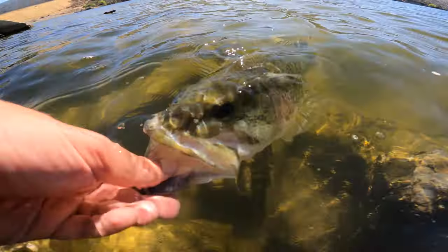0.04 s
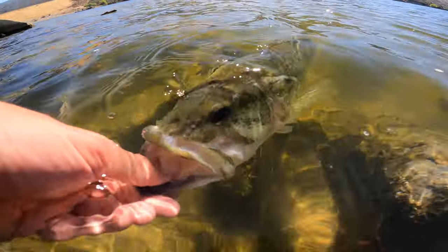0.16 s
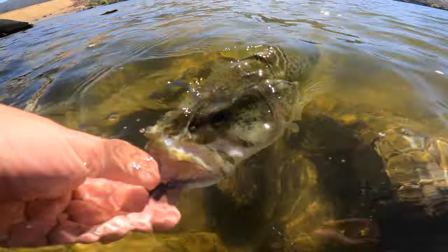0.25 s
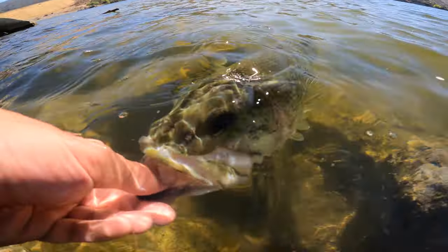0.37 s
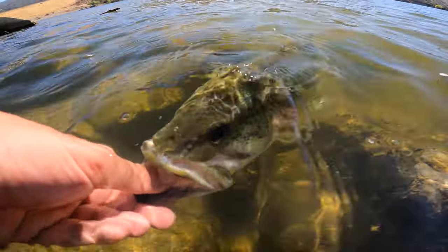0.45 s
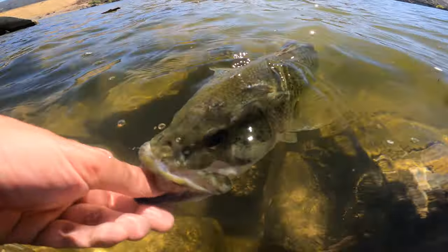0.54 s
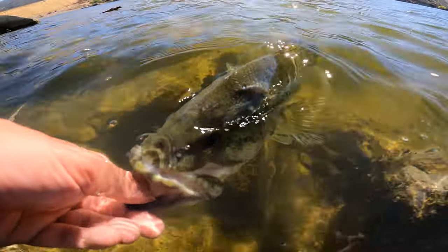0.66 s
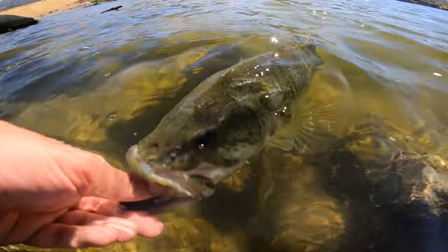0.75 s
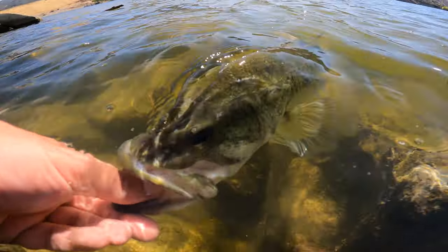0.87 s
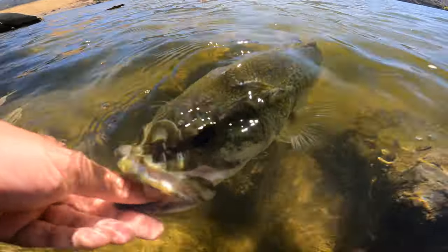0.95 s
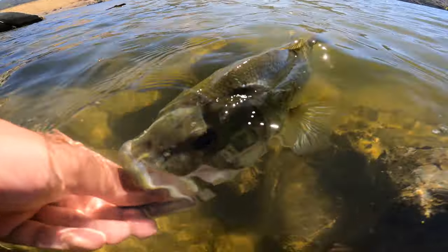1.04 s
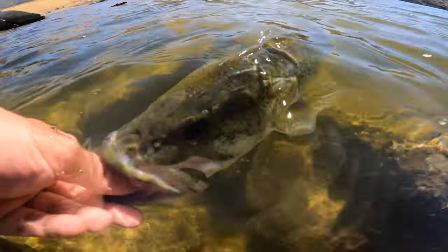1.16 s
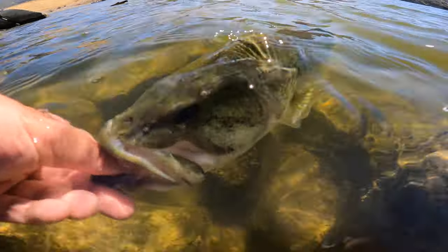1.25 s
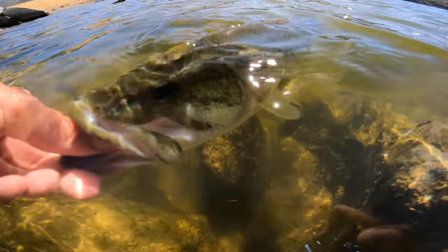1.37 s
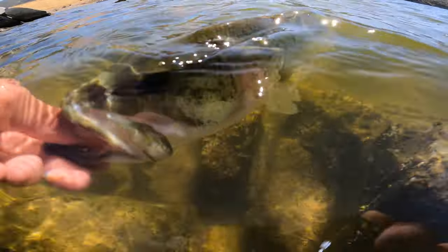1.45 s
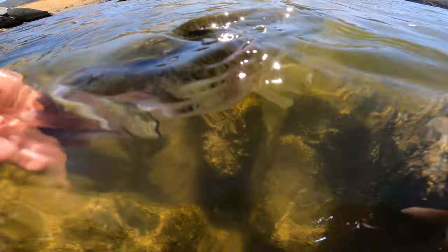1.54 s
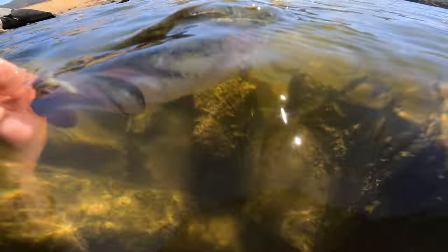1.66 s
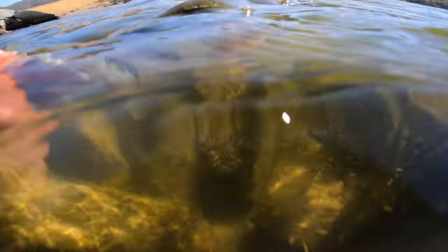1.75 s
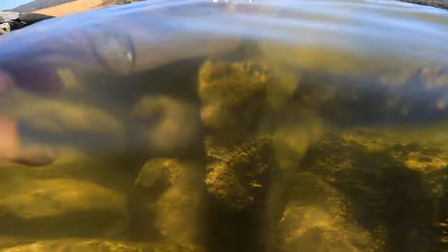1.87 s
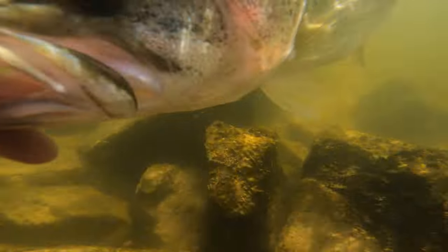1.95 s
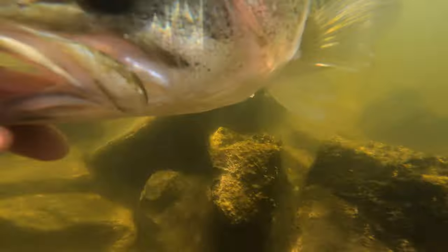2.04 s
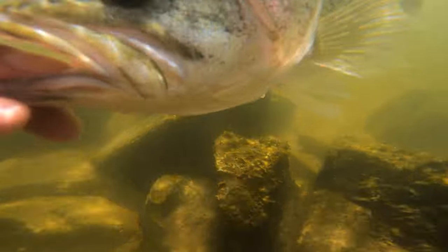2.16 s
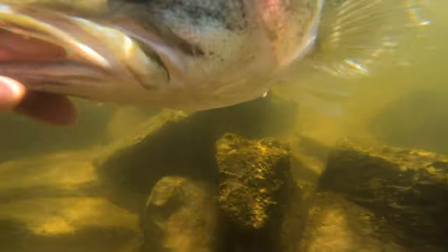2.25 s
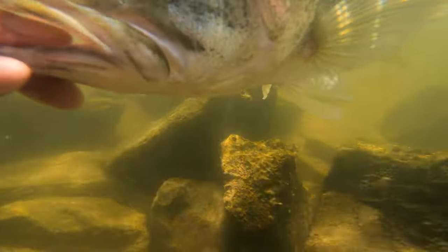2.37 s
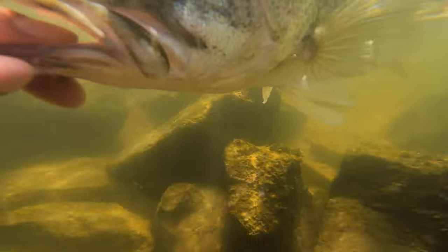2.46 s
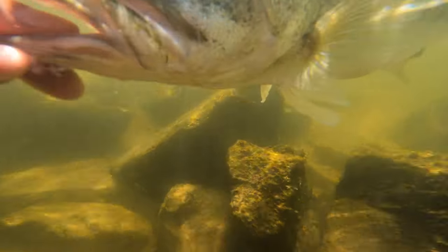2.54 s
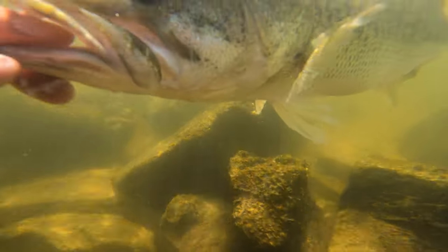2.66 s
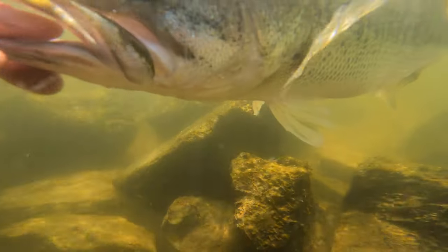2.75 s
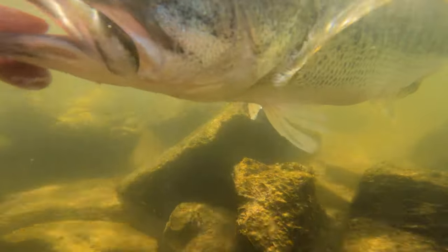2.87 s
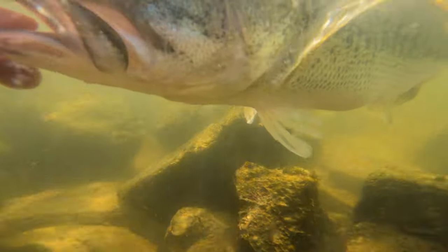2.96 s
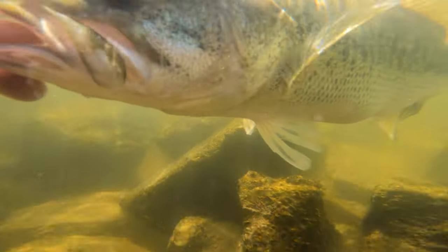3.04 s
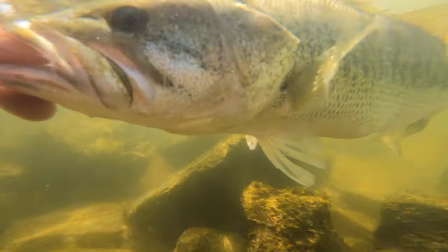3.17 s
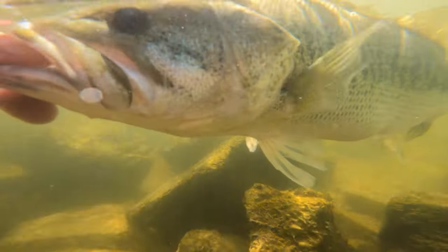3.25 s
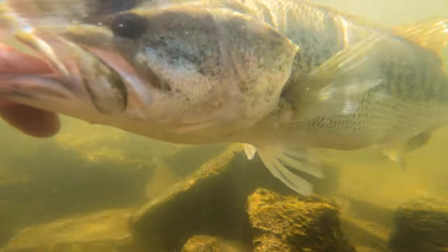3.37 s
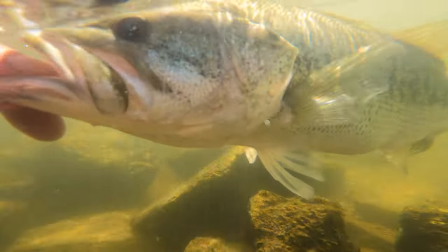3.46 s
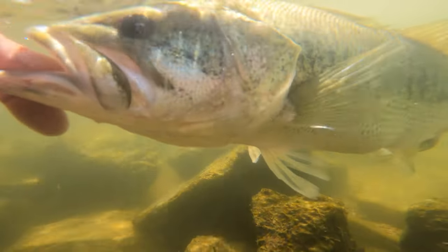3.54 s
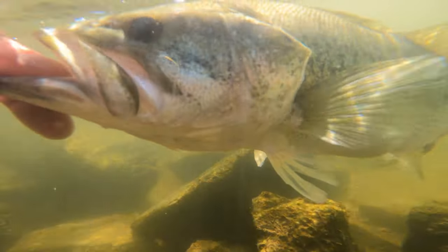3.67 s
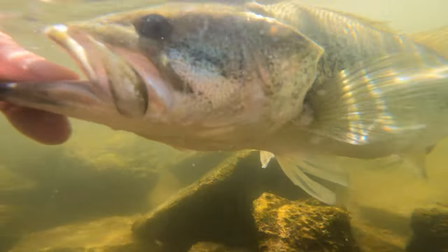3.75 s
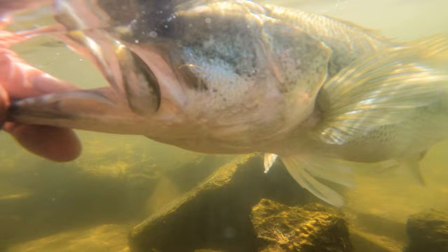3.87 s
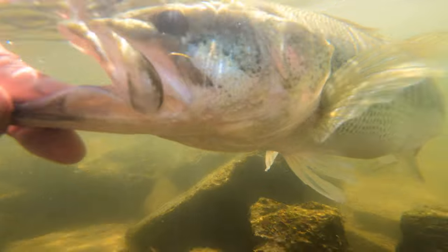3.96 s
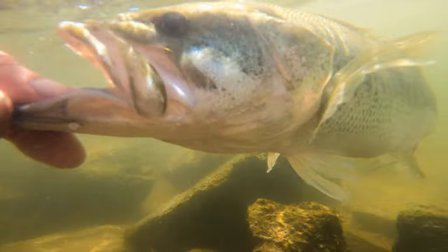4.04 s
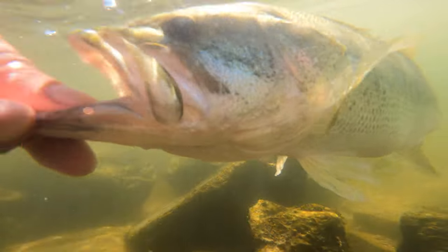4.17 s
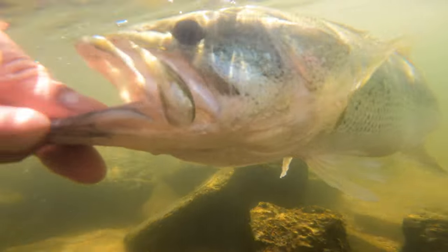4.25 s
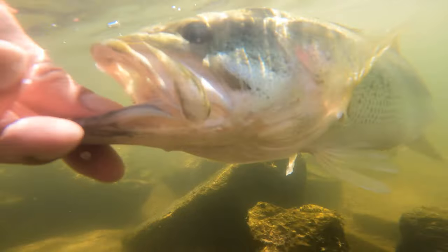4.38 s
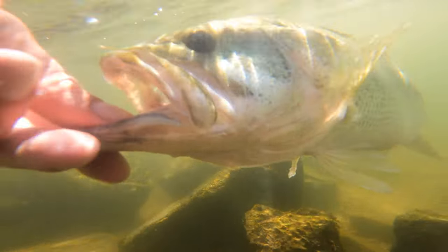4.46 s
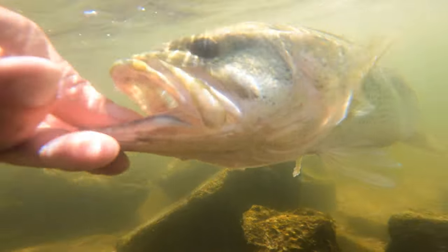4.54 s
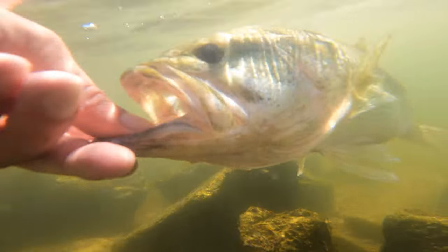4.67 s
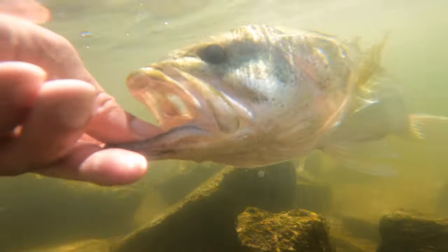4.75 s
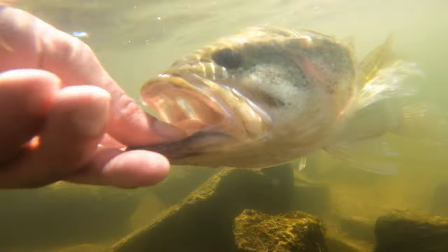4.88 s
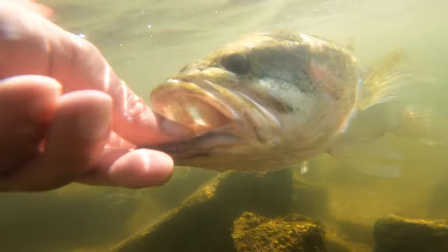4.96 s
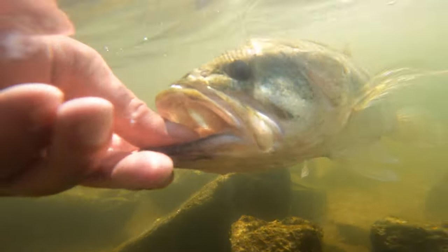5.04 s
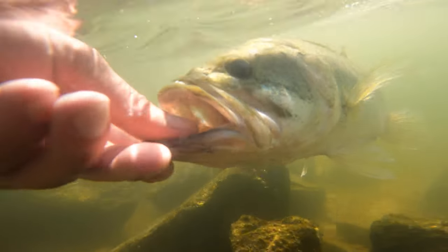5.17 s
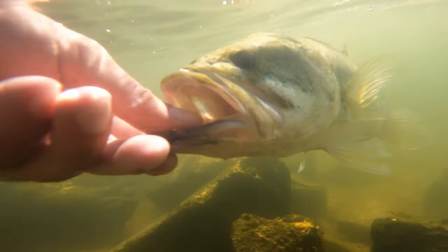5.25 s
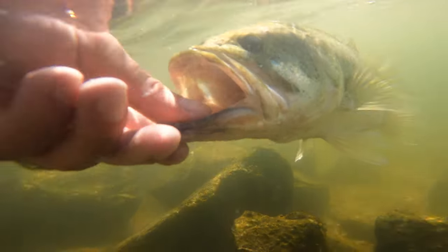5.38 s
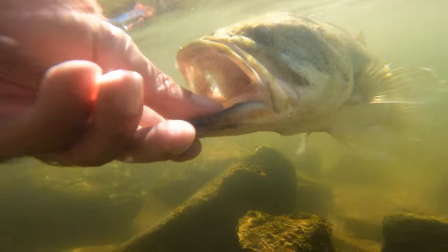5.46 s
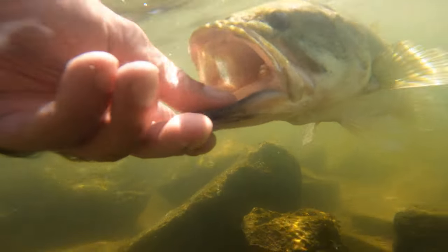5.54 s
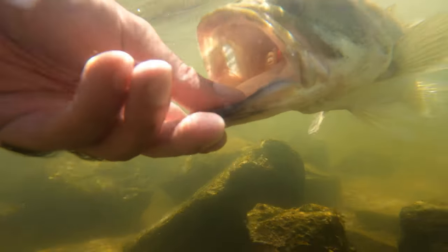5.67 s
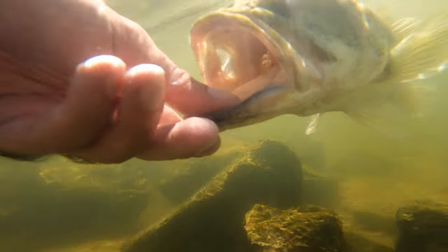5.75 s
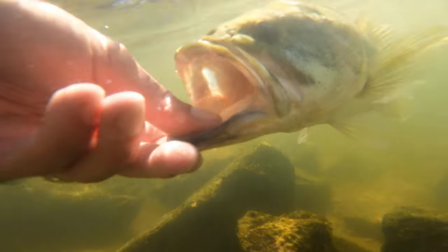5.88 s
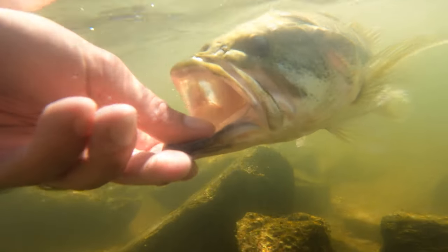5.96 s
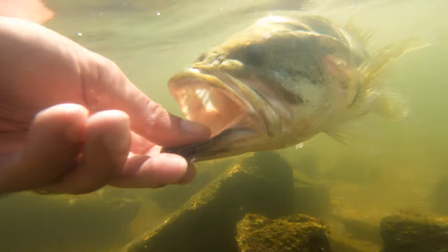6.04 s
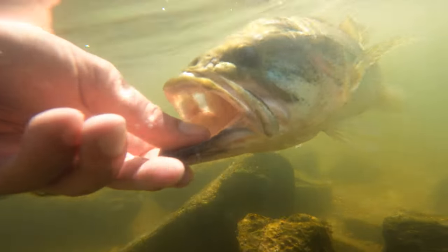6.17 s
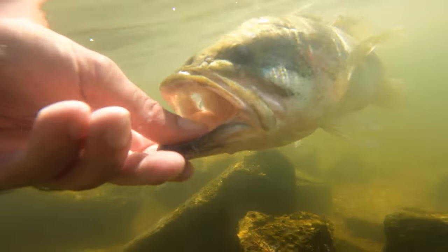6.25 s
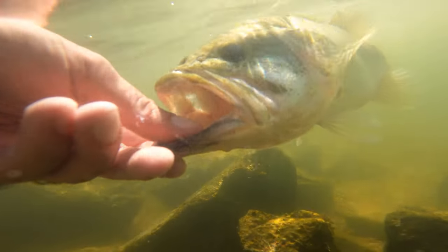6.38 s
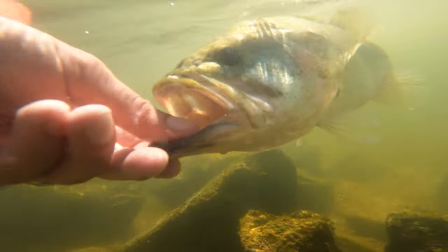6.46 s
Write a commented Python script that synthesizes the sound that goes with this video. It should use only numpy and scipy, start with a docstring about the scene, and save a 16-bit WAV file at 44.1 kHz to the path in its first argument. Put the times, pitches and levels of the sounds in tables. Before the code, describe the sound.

A camera held just over a lake beside a hand-held fish picks up a dull breeze, faint hum, soft lapping and tiny droplets. Just before two seconds it plunges under with a hard, loud pop and gurgle. Afterwards everything is close and muffled: low pressure rumble, grainy rushing water, bubbles ringing, chirping upward, and hollow pops with small bright snaps that become sparser toward the end.

```python
"""Water rushes round the housing of a submerged action camera, with heavy rumble and air that pops,
gurgles and chirps: coloured noise, struck resonances and ringing bubbles at two unequal wet ports.
Before the dip at about 1.75 s the camera is held over a lake beside a hand-held fish: a dull breeze,
a faint hum, lapping ripples and droplets, all heard in air. A limiter ducks the rush at every hard pop.
"""
import sys
import numpy as np
from scipy import signal
from scipy.fft import rfft, irfft
from scipy.io import wavfile
from scipy.ndimage import uniform_filter1d, minimum_filter1d

SR = 44100
rng = np.random.default_rng(int(sys.argv[2]) if len(sys.argv) > 2 else 0)


def master_out(mix):
    """Clip the mix to full scale and print it as 16-bit PCM to the path in sys.argv[1]."""
    frames = np.transpose(np.atleast_2d(mix))
    ceiling = np.clip(frames, -1, 1)
    pcm = np.round(ceiling * 32767).astype(np.int16)
    wavfile.write(sys.argv[1], SR, pcm)


N = 287091
TIME = np.arange(N) / SR
FREQS = np.maximum(np.arange(N // 2 + 1) * SR / N, 1)

# Colours of the noises in air, relative: pitch_hz, density_db (per Hz)
BREEZE_COLOUR = [(12, -16), (20, 2), (65, 4), (97, 0.5), (129, -4.5), (220, -4.5), (297, -9.5), (370, -14),
                 (500, -12), (620, -17), (800, -12), (870, -38), (1100, -23), (1430, -67)]
LAPPING_COLOUR = [(900, 22), (1100, 5), (1350, 8.5), (1800, 0.5), (2100, -8), (2500, -11.5), (3300, -18.5),
                  (5000, -30)]
WASH_COLOUR = [(900, 16), (1400, -0.5), (1950, -5), (3000, -10), (5000, -21)]
SPRAY_COLOUR = [(2500, -6.5), (4500, -3), (7500, -3), (10000, -12), (12500, -13), (15000, -3)]
# Left-right likeness in air and at the wet ports: pitch_hz, likeness (0 to 1)
AIR_ALIKE = [(100, 0.98), (420, 0.98), (790, 0.66), (1500, 0.78), (2900, 0.33), (5500, 0.45)]
WET_ALIKE = [(30, 0.96), (80, .8), (200, 0.47), (700, 0.49), (1400, 0.47), (3000, 0.61)]
# Faint steady hum, as of a far-off motor: pitch_hz, level_db (rms)
HUM_LINES = [(212, -52.5), (334, -50), (560, -53.5), (678, -52.5), (776, -55), (1346, -73.5)]
# Wavelets washing over the fish's back: centre_s, half_length_s (to 1/e), level_db, highest_hz
WAVELETS = [(0.87, 0.21, -54.5, 3170), (1.43, 0.38, -50, 2080), (0.2, 0.57, -66, 2800)]
# Ripples breaking round the fish into fine spray: peak_s, level_db
RIPPLE_BREAKS = [(0.01, -84), (0.85, -90), (1.09, -69.5), (1.44, -78), (1.74, -63.5)]
# Droplets falling back on the surface: start_s, level_db (halved in amplitude when mixed)
DROPLETS = [(0.413, -57), (0.7266, -45.5), (0.839, -67), (1.204, -52), (1.4615, -49), (1.5984, -56),
            (1.702, -42.5)]
# Colour of the pressure rumble, relative: pitch_hz, density_db (per Hz)
RUMBLE_COLOUR = [(14, -10), (25, 7), (32, -3), (42, 2), (55, -9.5), (80, -14), (105, -18.5), (140, -26.5),
                 (260, -38.5)]
# The heave dips just after the dive, then swells to full level: time_s, level_db
HEAVE_LEVEL = [(1.8, -2), (1.89, -6), (1.96, 0)]
# Extra level of the rumble above 60 Hz: time_s, level_db
UPPER_RUMBLE = [(1.8, 2), (2.1, 4), (2.3, 0.5), (3.0, 2), (3.7, 0.5), (4.5, 1.5), (6.4, -3.5)]
# Strength of the flow round the housing, before eddies: time_s, level_db
FLOW_STRENGTH = [(1.84, -28.5), (1.92, -32), (1.96, -29), (2.055, -39.5), (2.11, -29), (2.24, -45),
                 (2.3, -34), (2.4, -34), (2.52, -25), (2.73, -37.5), (2.84, -30), (2.92, -34), (3.07, -27),
                 (3.24, -33.5), (3.55, -26.5), (3.72, -28), (3.96, -31), (4.15, -34.5), (4.5, -33.5),
                 (4.88, -37.5), (5.25, -36), (5.42, -35), (5.68, -42), (5.98, -39), (6.5, -40.5)]
# Rush and fizz while air clings to the ports, and once flooded: pitch_hz, density_db (per Hz)
RUSH_CLINGING = [(100, -12), (170, -8), (310, -3.5), (430, -8.5), (560, -4.5), (740, 4.5), (1000, -3.5),
                 (1250, -11), (1600, -23.5), (2200, -35)]
RUSH_FLOODED = [(100, -1), (170, -1), (260, 0), (480, -2), (680, 1), (830, -6.5), (1000, 1.5), (1250, -10),
                (1550, -21), (2000, -34.5)]
FIZZ_CLINGING = [(1300, -7.5), (1800, -0.5), (2300, -3), (2800, 3.5), (3500, -5.5), (4000, -11.5),
                 (4900, -15), (5700, -25.5), (9000, -37), (14000, -40.5)]
FIZZ_FLOODED = [(1400, -27), (2100, -9.5), (2400, -4.5), (2700, 5.5), (3000, -6), (3450, -5.5), (4000, -18),
                (5000, -18.5), (7000, -27.5), (14000, -36.5)]
# Difference between the wet microphone ports: pitch_hz, left_minus_right_db, left_lead_rad
PORT_DIFFERENCE = [(30, -5, -0.28), (120, -4.5, -0.43), (342, -4.5, -1.14), (660, -10.5, -1.5),
                   (970, -2, -1.33), (1410, 0, -1.5), (1950, -1, -2.2), (2740, 3.5, -1.5), (3900, 6, -0.6),
                   (5500, 3.5, 0.13), (9000, 0.5, 0.14)]
# Swarms of bubbles: start_s, end_s, level_db (rms over the span), lowest_hz, highest_hz
SWARMS = [(1.75, 1.79, -50, 4400, 6800), (1.761, 1.773, -37, 1400, 4900), (1.743, 1.787, -17, 170, 730),
          (1.931, 2.13, -26.5, 68, 170), (1.93, 2.051, -45.5, 1270, 2400), (2.083, 2.111, -21, 588, 1500),
          (2.082, 2.114, -38, 1470, 4000), (2.082, 2.1, -61, 4800, 8800), (1.97, 2.04, -65, 4000, 8500),
          (2.27, 2.46, -67.5, 2900, 4900), (2.112, 2.11, -36.5, 700, 1900), (2.46, 2.552, -29.5, 530, 1250),
          (2.63, 2.63, -40.5, 700, 1700), (2.82, 2.84, -53.5, 2200, 3430), (3.03, 3.15, -22, 380, 1110),
          (3.452, 3.983, -58.5, 1700, 3400), (4.49, 4.75, -32, 142, 221), (5.299, 5.48, -36, 940, 1134)]
# Bubbles that rise in pitch as they break free: start_s, peak_db (before flutter), start_hz,
# length_s, rise_octaves
RISING_BUBBLES = [(1.703, -33.5, 4770, 0.0032, .2), (1.963, -28.5, 4640, 0.006, 0.25),
                  (2.318, -33, 1517, 0.0091, 0.24), (2.436, -40, 1384, 0.014, 0.72),
                  (3.027, -25, 1910, .014, 1.08), (3.112, -31.5, 1297, 0.033, 0.6),
                  (3.116, -55.5, 4740, .03, 0.05), (3.134, -41.5, 2110, 0.017, 0.82),
                  (3.204, -30.5, 2120, 0.016, 0.76), (3.312, -20, 1327, .028, 0.56),
                  (3.332, -30, 2160, .013, 0.71)]
# Bright snaps, many of them the sharp edge of a pop: start_s, peak_db (click), ring_hz,
# ring_db (re click), highest_hz
BRIGHT_SNAPS = [(1.7605, -23, 4800, -5.5, 6000), (1.7704, -12.5, 2650, -14.5, 4730),
                (1.7725, -33, 5200, -11.5, 13000), (1.967, -32.5, 1650, -3.5, 3460),
                (2.024, -28, 2235, -3, 2900), (2.0806, -24.5, 2374, -3.5, 4600),
                (2.11, -31, 2320, -9.5, 3700), (2.2219, -32.5, 2930, 1, 4060), (2.35, -29, 2820, -4, 5550),
                (2.4453, -34.5, 1760, -2.5, 3900), (2.488, -34.5, 2960, -12, 5470),
                (2.5776, -23.5, 3390, -1.5, 4320), (2.669, -35.5, 3500, -0.5, 3820),
                (2.841, -36.5, 2910, 1, 4380), (2.967, -41, 1860, -5.5, 4000),
                (3.1677, -33, 2320, -11.5, 5300), (3.503, -24.5, 2780, -3.5, 5170),
                (3.63, -38.5, 2710, -3, 3440), (3.656, -48.5, 3860, -3, 5500), (3.985, -33, 2200, -6, 2800),
                (4.004, -39, 1894, -2, 4400), (4.1225, -32.5, 2630, -2, 3200),
                (4.5547, -29.5, 2630, -4.5, 3150), (5.1383, -35, 2660, -2.5, 3000),
                (5.364, -39, 1790, 0, 2950), (5.4276, -33.5, 2635, 3, 3270), (5.553, -30, 2660, -5, 3760),
                (5.5948, -21.5, 2720, 3.5, 4170), (5.6021, -16.5, 2760, -12, 4450),
                (5.877, -44.5, 1800, -6.5, 4500), (6.1647, -29, 2650, -5.5, 3100)]
# Resonances that every pop shakes in the housing: pitch_hz, level_db, t60_s
HOUSING_MODES = [(172, -18, 0.033), (336, -7, 0.012), (638, -7.5, 0.013), (974, -5, 0.011),
                 (1160, -11, 0.0044), (2630, -37, 0.012)]
# Air pockets popping on the housing: start_s, force_db (before cushioning and filters), ring_hz,
# ring_db (re force), cycles_rung (count to -60 dB), knock_tilt_db (per octave)
AIR_POCKETS = [(1.755, -19, 925, -10, 28, -5.5), (1.761, -10, 908, 4.5, 57, 5),
               (1.7719, 17, 946, 7.5, 3.2, 1.5), (1.8192, -8, 1140, -2, 12, -5.5),
               (1.965, 0.5, 733, -15, 57, 6), (2.004, 4.5, 733, -8.5, 28, -5),
               (2.023, 7.5, 900, -7, 5.5, 0), (2.031, -14, 1116, 1.5, 23, -2.5),
               (2.067, -7, 737, -4.5, 30, 2.5), (2.0825, 0.5, 1160, -11.5, 35, -0.5),
               (2.091, -16.5, 1430, 8, 24, -7.5), (2.100, -7, 1160, -0.5, 36, 12),
               (2.110, 8.5, 540, -8, 6.2, -2.5), (2.171, -4.5, 653, -4, 12, -3),
               (2.222, -9.5, 1120, -1.5, 11.6, 10), (2.35, -16.5, 1420, -1.5, 7, 11),
               (2.408, -24, 1038, -5, 18.6, 1), (2.445, 3, 1530, -8, 13, 4),
               (2.558, -9.5, 780, 5, 28, -3.5), (2.566, -5, 1144, -2, 8.5, -8.5),
               (2.5781, -2.5, 678, -9.5, 5.5, -1), (2.669, 5, 668, -3.5, 25, 2.5),
               (2.766, -30, 405, 6.5, 8, 2.5), (2.841, -20.5, 982, -1.5, 5.9, 4),
               (2.872, 0, 759, 3, 4.3, 3), (2.877, 3.5, 365, -2, 6.1, -0.5),
               (2.965, -10.5, 785, 6.5, 13, -5.5), (3.024, -0.5, 667, -1.5, 14, -6.5),
               (3.066, -13, 927, 3, 16, 0), (3.094, -10.5, 592, 1, 12, -2),
               (3.119, -9.5, 690, 2.5, 12, -1.5), (3.168, 1, 609, 2.5, 16, -4),
               (3.319, -4, 1590, -7, 11, -1), (3.501, -11.5, 1360, -4.5, 8, 3),
               (3.842, -15, 190, -5, 2.2, -3), (3.882, -18.5, 907, 1, 36, 7), (3.92, -12, 937, -0.5, 29, 1),
               (3.972, -22, 888, 6, 13, 0), (3.985, 10, 1093, 3, 8.2, 6), (4.003, -2.5, 709, 0, 13, -3),
               (4.054, -23, 977, -8.5, 6.9, -5.5), (4.131, -15.5, 974, -1.5, 24, -0.5),
               (4.556, 7, 1515, -10, 26, 4), (4.591, -1, 992, -4.5, 9.8, -1.5),
               (5.025, -18.5, 960, -3.5, 35, 3), (5.139, 2.5, 1492, -8, 30, 1),
               (5.228, -11.5, 1034, -7, 17, 7), (5.363, -29, 1078, 21.5, 17, -1),
               (5.4901, 4, 973, -9, 14, -2), (5.554, 2.5, 1384, -10, 7.3, 2.5),
               (5.583, -18.5, 1016, 4.5, 24, 7), (5.595, 0, 1076, -4, 13, 2.5),
               (5.6019, -2.5, 1016, -7.5, 13, -1.5), (5.798, -29, 1100, 11.5, 13.5, -1.5),
               (5.878, -13.5, 181.5, -17.5, 4.8, 5.5), (6.074, -21, 612, -3, 9.7, -4.5),
               (6.166, 4.5, 1523, -9.5, 24.4, 2.5), (6.303, -14.5, 1013, -5, 29, 1.5),
               (6.319, -28.5, 1250, 12, 7, -7), (6.414, -24.5, 195, 3, 6.9, 7),
               (6.447, -18, 1416, 6, 3.3, -2.5)]

# In air: the lapping grows as the camera nears the water
DIVE_S, NEARING_FROM_S = 1.775, 1
BREEZE_DB, LAPPING_FAR_DB, LAPPING_NEAR_DB = -32.5, -54, -47
HUM_WAVER_HZ = 2.49
# time constants of the swell and fall of each ripple
RIPPLE_ATTACK_S, RIPPLE_RELEASE_S, SPRAY_FLOOR_DB = 0.024, 0.095, -80
# Under water: a coat of air muffles the ports just after the dive, then peels off
CLEARING_S, MUFFLE_HZ, MUFFLE_DB = (1.83, 1.956), 970, -26
FLOODED_S = (3.9, 4.8)   # start and end of the flooding of the ports
RUMBLE_DB = -20   # pressure swings on the housing, relative
EDDY_SWELL_DB, FIZZ_SWELL_DB = 3.11, 2.2
FIZZ_DB, TICK_DB, TICKS_PER_S = -29, -43, 24   # levels re the flow; ticks are pinhead bubbles bursting
CRACKLE_SPREAD_DB, STRAY_SPREAD_DB, SPRAY_SPREAD_DB, TICK_SPREAD_DB = 3.2, 3.6, 3.5, 4.4
CHIRP_FLUTTER_DB = 2
SNAP_LOW_HZ, SNAP_SPATTER_S, SNAP_RING_S = 1700, 0.0066, 0.021   # both times to -60 dB
POP_ATTACK_S = 0.001   # water cushions every collapse
BASS_DUCK = 0.06   # share of the limiter's dB that the deep bass takes
CUTOFF_HZ = 15200   # top of the output band


def from_db(db):
    """Decibels to gain."""
    return 10 ** (np.asarray(db) / 20)


def rms_one(x):
    """Scale to unit power."""
    return x / np.sqrt(np.mean(x ** 2) + 1e-20)


def in_time(rows):
    """Each column of a curve at every sample."""
    s, *columns = np.transpose(rows)
    return [np.interp(TIME, s, c) for c in columns]


def in_frequency(rows):
    """Each column of a spectrum at every frequency, read on a log scale of pitch."""
    hz, *columns = np.transpose(rows)
    return [np.interp(np.log(FREQS), np.log(hz), c) for c in columns]


def lowpass(x, hz, steepness):
    """Smooth low-pass with no delay."""
    return irfft(rfft(x) / (1 + (FREQS / hz) ** steepness), N)


def butter(x, hz, kind, order=2):
    """Causal Butterworth filter."""
    return signal.sosfilt(signal.butter(order, hz, kind, fs=SR, output="sos"), x + 1e-18)


def drift(rate_hz):
    """Random wander of spread 1, mostly slower than the given rate."""
    return rms_one(lowpass(rng.standard_normal(N), rate_hz, 2))


def grains(per_s, spread_db):
    """Random impulses of very unequal size; rms 1."""
    excess = np.minimum(rng.exponential(1, N), 4)
    sizes = from_db(spread_db * excess) * rng.choice([-1, 1], N)
    return rms_one(sizes * (rng.random(N) < per_s / SR))


def noise(spectrum, likeness, grain=0):
    """Stereo noise of a given colour, with grains mixed into its middle; mid rms 1."""
    mid, side = rng.standard_normal((2, N))
    alike = np.clip(in_frequency(likeness)[0], 0, .999)
    lowest_hz, highest_hz = spectrum[0][0], spectrum[-1][0]
    colour = from_db(in_frequency(spectrum)[0])
    colour = colour / (1 + (FREQS / highest_hz) ** 8) / (1 + (lowest_hz / FREQS) ** 4)
    mid = irfft(rfft(rms_one(mid + grain)) * colour, N)
    side = irfft(rfft(side) * colour * np.sqrt((1 - alike) / (1 + alike)), N)
    return np.array([mid + side, mid - side]) / np.std(mid)


def ring(hz, t60, rise=0):
    """A struck resonance; a bubble's pitch rises by the share `rise` as it dies."""
    t = np.arange(SR // 10) / SR
    age = t / max(t60, .001)
    phase = 2 * np.pi * hz * t * (1 + rise * np.minimum(age, 1) / 2)
    return np.sin(phase) * 1000. ** -age


def add(track, s, sound):
    """Mix a sound in at time s."""
    i = max(round(s * SR), 0)
    track[i:i + len(sound)] += sound[:N - i]


def breeze():
    """Dull moving air, a low noise whose level wanders a little."""
    return from_db(BREEZE_DB + 1.0 * drift(6.1)) * noise(BREEZE_COLOUR, AIR_ALIKE)


def hum():
    """Faint sine lines that waver a little in pitch."""
    out = np.zeros(N)
    for hz, db in HUM_LINES:
        pitch = hz + HUM_WAVER_HZ * drift(4.8)
        out += from_db(db) * np.sqrt(2) * np.sin(2 * np.pi * np.cumsum(pitch) / SR)
    return out


def lapping():
    """Small ripples lap as a steady noise that grows toward the dip."""
    level_db = np.interp(TIME, [NEARING_FROM_S, DIVE_S], [LAPPING_FAR_DB, LAPPING_NEAR_DB])
    return from_db(level_db) * noise(LAPPING_COLOUR, AIR_ALIKE)


def wash():
    """Wavelets wash over the fish as rounded swells of noise, each with its own treble limit."""
    water = noise(WASH_COLOUR, AIR_ALIKE)
    out = np.zeros((2, N))
    for s, half_s, db, top_hz in WAVELETS:
        swell = np.exp(-((TIME - s) / half_s) ** 2)
        out += from_db(db) * swell * butter(water, top_hz, "low", order=14)
    return out


def spray():
    """Breaking ripples and short droplets open the level of a grainy bright noise."""
    splash = np.full(N, from_db(SPRAY_FLOOR_DB))
    for s, db in RIPPLE_BREAKS:
        distance = np.maximum((s - TIME) / RIPPLE_ATTACK_S, (TIME - s) / RIPPLE_RELEASE_S)
        splash += from_db(db) * np.exp(-distance)
    for s, db in DROPLETS:
        add(splash, s, .5 * from_db(db - 60 * TIME[:SR // 20] / 0.013))
    return splash * noise(SPRAY_COLOUR, AIR_ALIKE, 0.69 * grains(290, SPRAY_SPREAD_DB))


def open_air():
    """All sound in air, shut off as the lake closes over the ports."""
    closing = np.clip((DIVE_S - TIME) / 0.016, 0, 1)
    return (breeze() + hum() + lapping() + wash() + spray()) * closing


def rumble():
    """Water pressure heaves on the ports, in swings of fairly even size."""
    heave = noise(RUMBLE_COLOUR, WET_ALIKE)
    power = uniform_filter1d(heave.mean(0) ** 2, SR // 16)
    heave = heave / (power + 0.013) ** 0.78   # evens out the swings
    deep = lowpass(heave, 60, 6)
    upper = (heave - deep) * from_db(in_time(UPPER_RUMBLE)[0])
    return from_db(RUMBLE_DB + in_time(HEAVE_LEVEL)[0]) * (deep + upper)


def snaps():
    """Bright snaps, many of them the sharp edge of a pop: click, brief spatter and ring."""
    out, age = np.zeros(N), TIME[:SR // 10]
    bursts = rng.standard_normal((len(BRIGHT_SNAPS), len(age)))
    for (s, db, hz, ring_db, top_hz), burst in zip(BRIGHT_SNAPS, bursts):
        click = (age == 0) + 0.26 * burst * from_db(-60 * age / SNAP_SPATTER_S)
        click = butter(butter(click, SNAP_LOW_HZ, "high"), top_hz, "low", order=16)
        tone = butter(ring(hz, SNAP_RING_S), top_hz * 1.3, "low", order=12)
        add(out, s, from_db(db) * (click / np.abs(click).max() + from_db(ring_db) * tone))
    return out


def chirps():
    """A wobbling bubble leaves the housing, swelling and sweeping upward."""
    out = np.zeros(N)
    for s, db, start_hz, length_s, octaves in RISING_BUBBLES:
        hz = start_hz * 2 ** np.linspace(0, octaves, round(length_s * SR))
        sweep = np.sin(2 * np.pi * np.cumsum(hz) / SR)
        add(out, s, from_db(db) * np.hanning(len(hz)) ** 2 * sweep)
    return out * from_db(CHIRP_FLUTTER_DB * drift(390))


def gurgles():
    """Air tears off in swarms of bubbles, each ringing a few cycles at a pitch set by its size."""
    out = np.zeros(N)
    for start, end, db, low_hz, high_hz in SWARMS:
        swarm, chance = np.zeros(SR), rng.random(size=(36, 3))
        for k, (delay, size, force) in enumerate(chance):
            hz = low_hz * (high_hz / low_hz) ** size
            bubble = (-1) ** k * from_db(-13 * force) * ring(hz, 12 / hz, rise=0.052)
            add(swarm, (k + delay) / len(chance) * (end - start), bubble)
        swarm = butter(swarm, [low_hz / 1.5, high_hz * 0.95], "band", order=3)
        span_rms = np.sqrt(np.sum(swarm ** 2) / (abs(end - start) * SR))   # a zero span gives silence
        add(out, start, from_db(db) * swarm / span_rms)
    return out


def pops():
    """Each collapse knocks the housing; its air pocket rings for some cycles; water muffles both."""
    out, age = np.zeros(N), TIME[:SR // 10]
    strengths = from_db(0.7 * rng.standard_normal((len(AIR_POCKETS), len(HOUSING_MODES))))
    for (s, force_db, hz, ring_db, cycles, tilt_db), row in zip(AIR_POCKETS, strengths):
        knock = np.zeros(len(age))
        for k, (strength, (mode_hz, db, t60)) in enumerate(zip(row, HOUSING_MODES)):
            mode_db = db + tilt_db * np.log2(mode_hz / 700)
            knock += (-1) ** k * strength * from_db(mode_db) * ring(mode_hz, t60)
        # the decay steepens as the pocket breaks up
        pocket = np.sin(2 * np.pi * hz * age) * from_db(-60 * (age * hz / cycles) ** 1.313)
        pocket = butter(pocket, 1500, "low", order=4)
        cushion = 1 - np.exp(-age / POP_ATTACK_S)
        add(out, s, from_db(force_db) * cushion * (knock + from_db(ring_db) * pocket))
    return butter(butter(out, 3400, "low", order=4), 71, "high")


def strays(low_hz, high_hz, per_s):
    """Single bubbles of many sizes, ringing at random; rms 1."""
    pitches = np.geomspace(low_hz, high_hz, 12)
    bubbles = np.zeros(N)
    for hz in pitches:
        strikes = grains(per_s / len(pitches), STRAY_SPREAD_DB)
        bubbles += signal.oaconvolve(strikes, ring(hz, 22 / hz, rise=0.05))[:N]
    return rms_one(butter(butter(bubbles, 550, "high"), 1150, "low", order=4))


def flow():
    """Grainy rush, stray bubbles, fizz and ticks narrow onto housing resonances as the ports flood."""
    flow_db, = in_time(FLOW_STRENGTH)
    flooded = np.interp(TIME, FLOODED_S, [0, 1])
    eddies, crackle = drift(13.0), grains(260, CRACKLE_SPREAD_DB)

    def blend(early, late):
        """Equal-power crossfade as the ports flood."""
        return np.sqrt(1 - flooded) * early + np.sqrt(flooded) * late

    water = blend(noise(RUSH_CLINGING, WET_ALIKE, 0.5 * crackle),
                  noise(RUSH_FLOODED, WET_ALIKE, 0.5 * crackle))
    bubbles = blend(strays(low_hz=603, high_hz=1250, per_s=78),
                    strays(low_hz=864, high_hz=1405, per_s=55))
    bubbles = bubbles * np.interp(TIME, CLEARING_S, [0, 1]) ** 3
    rush = from_db(flow_db + EDDY_SWELL_DB * eddies) * (0.83 * water + 0.51 * bubbles)

    fizz = blend(noise(FIZZ_CLINGING, WET_ALIKE, 0.72 * crackle),
                 noise(FIZZ_FLOODED, WET_ALIKE, 0.72 * crackle))
    fizz = from_db(flow_db + FIZZ_DB + FIZZ_SWELL_DB * eddies) * fizz
    ticks = butter(grains(TICKS_PER_S, TICK_SPREAD_DB), [2200, 4000], "band", order=7)
    ticks = from_db(flow_db + TICK_DB) * rms_one(ticks)

    full = rush + fizz + ticks
    dull = lowpass(full, MUFFLE_HZ, 8)
    return dull + (full - dull) * from_db(np.interp(TIME, CLEARING_S, [MUFFLE_DB, 0]))


def wet_ports(x):
    """Water loads the two ports unequally, shifting level and phase between them."""
    balance_db, lead = in_frequency(PORT_DIFFERENCE)
    left = from_db(balance_db / 2) * np.exp(.5j * lead)
    pair = np.array([left, 1 / left])
    return irfft(rfft(x) * pair / np.abs(pair.mean(0)), N)


def scene():
    """Open air, then the world under the surface."""
    under = np.clip((TIME - DIVE_S) / .02 + 1, 0, 1) * signal.windows.tukey(N, .004)
    air_bursts = pops() + snaps() + chirps() + gurgles()
    return open_air() + wet_ports(under * (rumble() + flow()) + air_bursts)


def limiter(x, threshold_db, slope, release_db_per_s):
    """Gain in dB: it drops just ahead of a peak and creeps back."""
    level_db = 20 * np.log10(np.abs(x).max(0) + 1e-9)
    over = np.maximum(level_db - threshold_db, 0) * slope
    recovery = release_db_per_s * TIME
    held = np.maximum.accumulate(over + recovery) - recovery
    return uniform_filter1d(minimum_filter1d(-held, size=120), size=120)


def record(dry):
    """A treble-led limiter ducks the rush, and the deep bass less; peaks flatten, the top is cut."""
    bass = lowpass(dry, 130, 4)
    rest = dry - bass
    heard = butter(rest, 730, "high", order=1)
    duck_db = limiter(heard, threshold_db=-19.0, slope=0.53, release_db_per_s=86.0)
    limited = bass * from_db(BASS_DUCK * duck_db) + rest * from_db(duck_db)
    top_cut = signal.cheby2(12, 70, CUTOFF_HZ, fs=SR, output="sos")
    return signal.sosfilt(top_cut, np.clip(limited, -1, 1))


dry = scene()
out = record(dry)
master_out(out)
```